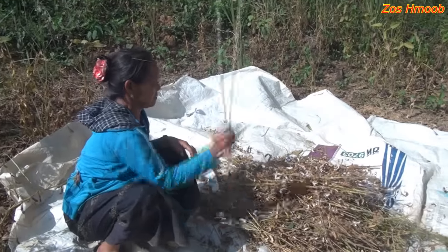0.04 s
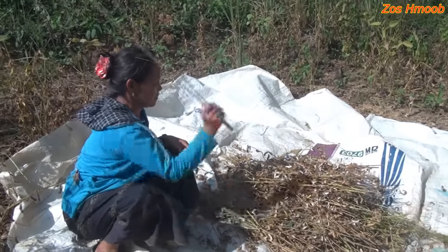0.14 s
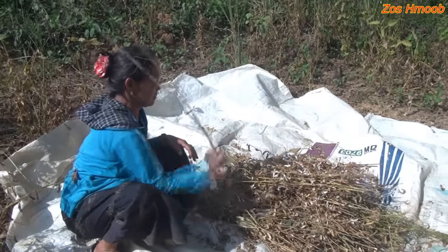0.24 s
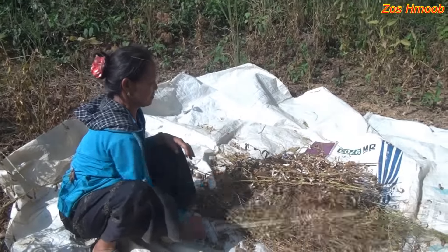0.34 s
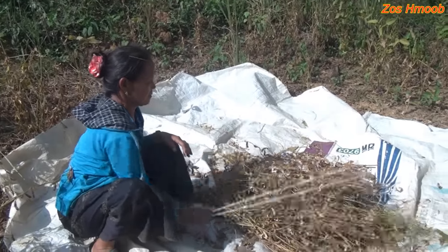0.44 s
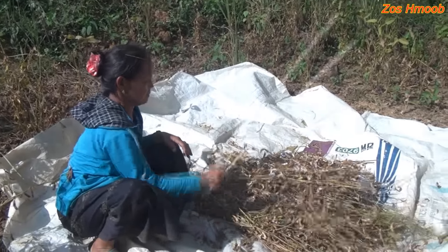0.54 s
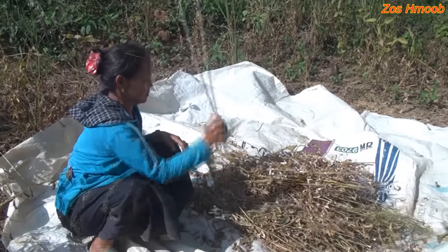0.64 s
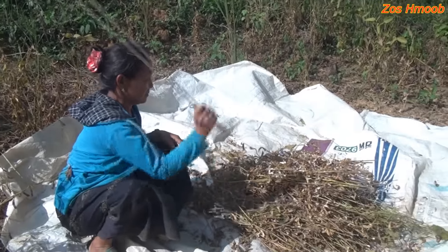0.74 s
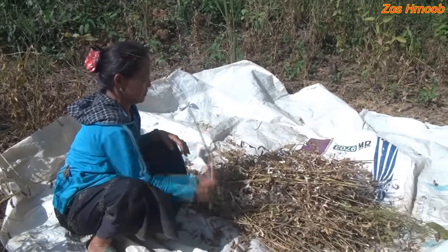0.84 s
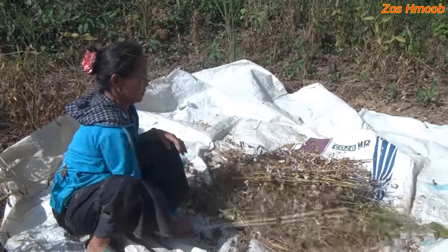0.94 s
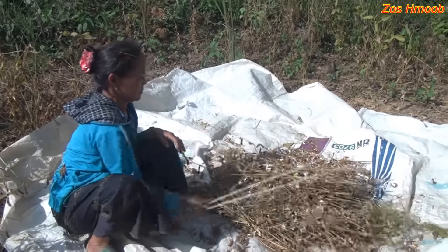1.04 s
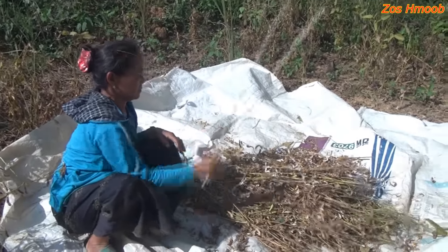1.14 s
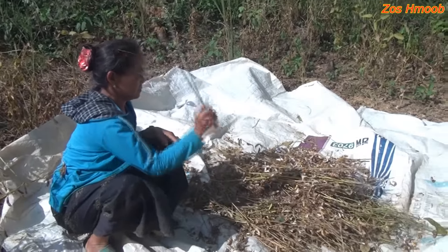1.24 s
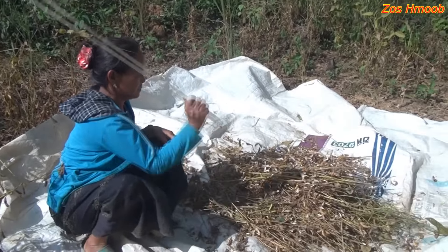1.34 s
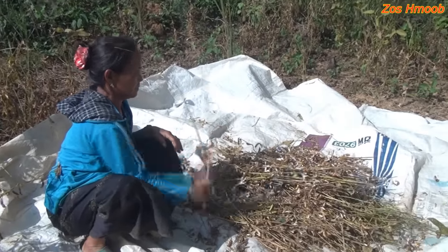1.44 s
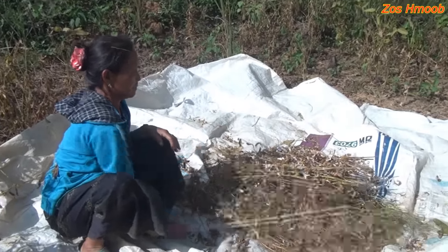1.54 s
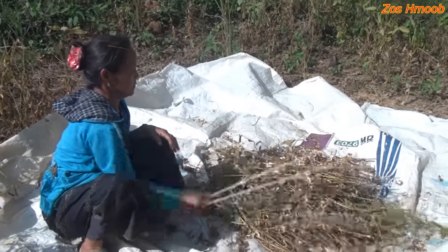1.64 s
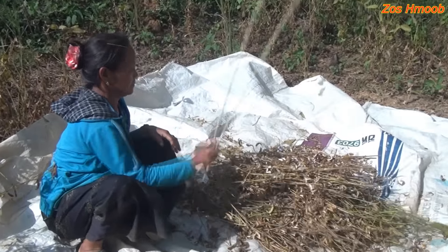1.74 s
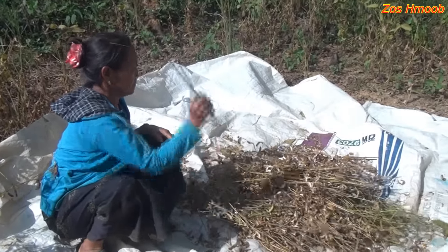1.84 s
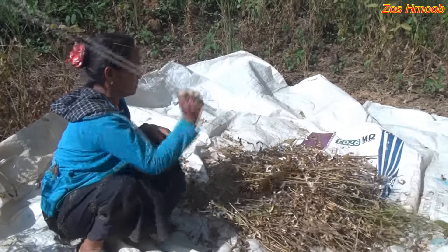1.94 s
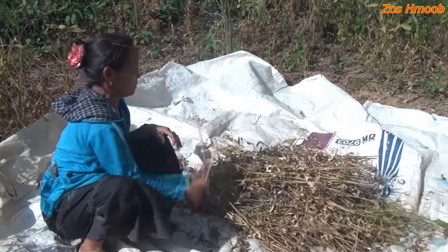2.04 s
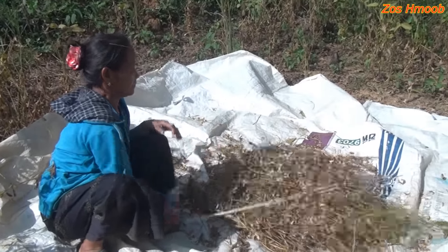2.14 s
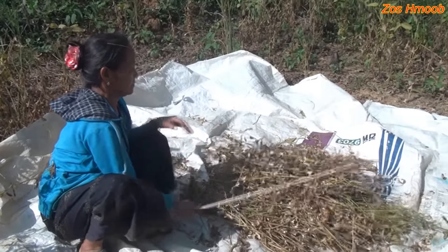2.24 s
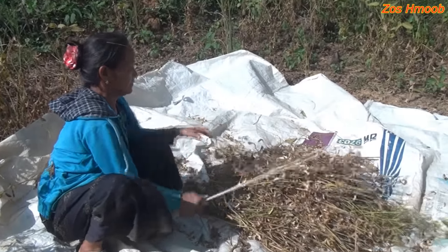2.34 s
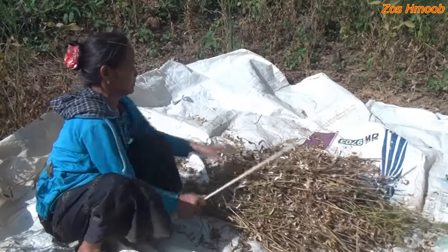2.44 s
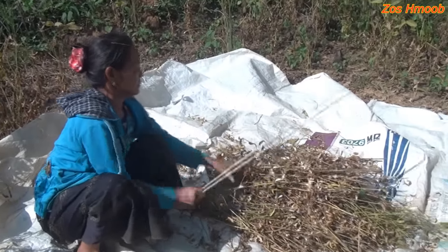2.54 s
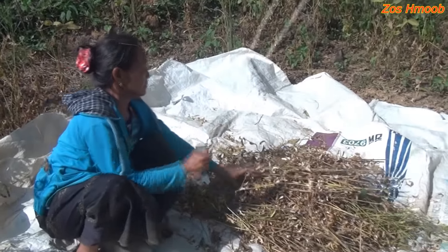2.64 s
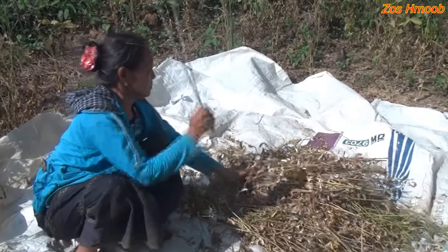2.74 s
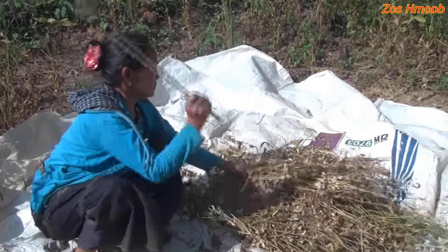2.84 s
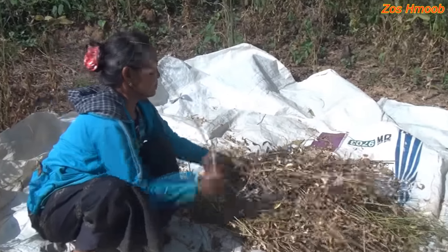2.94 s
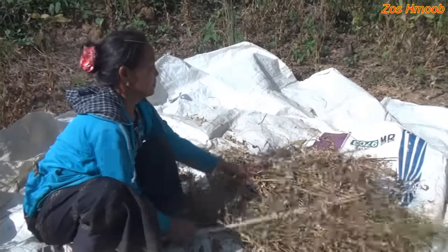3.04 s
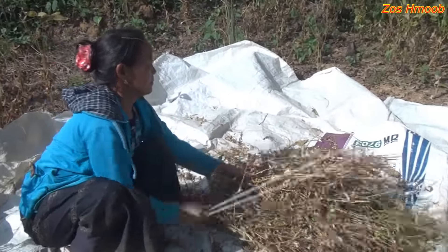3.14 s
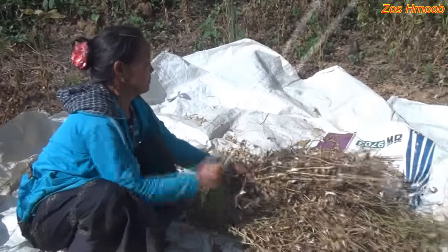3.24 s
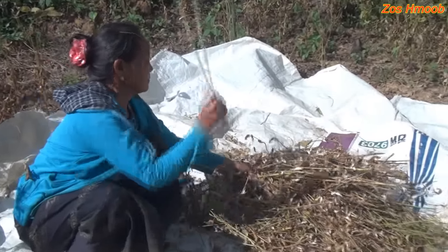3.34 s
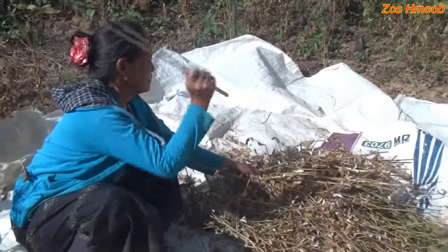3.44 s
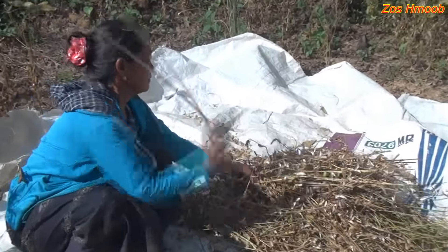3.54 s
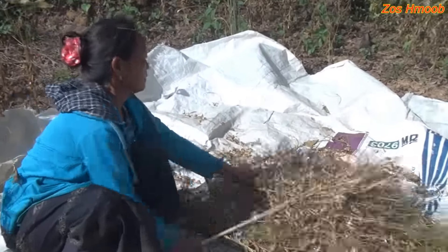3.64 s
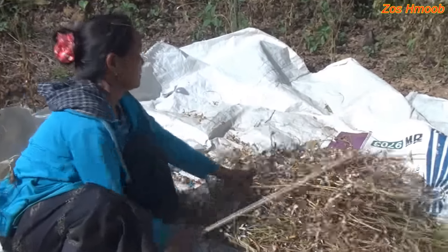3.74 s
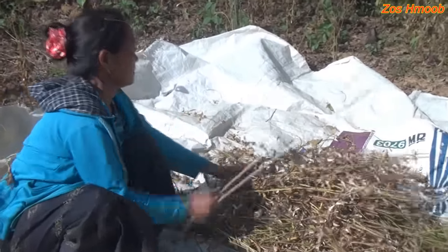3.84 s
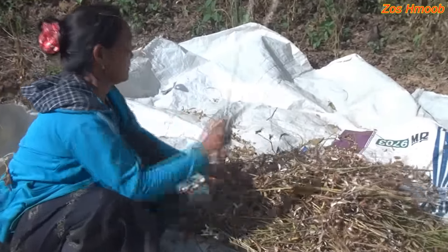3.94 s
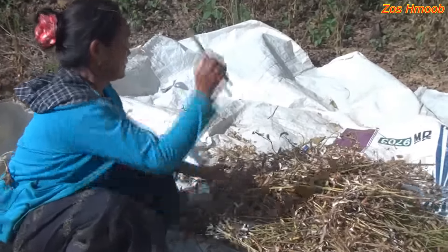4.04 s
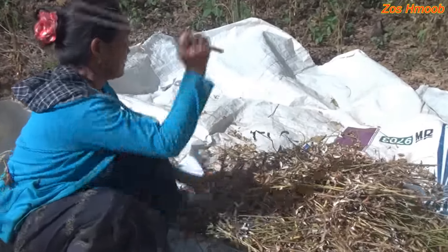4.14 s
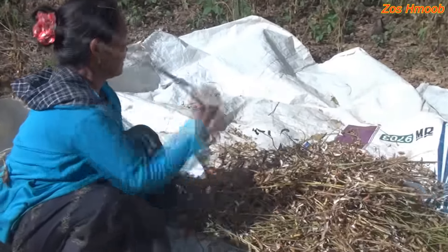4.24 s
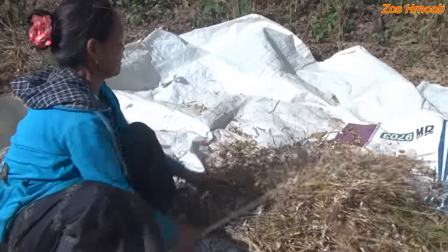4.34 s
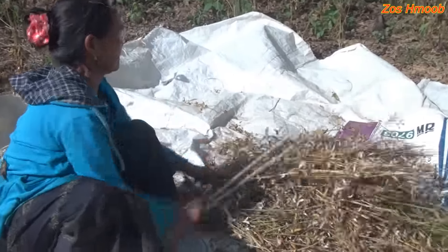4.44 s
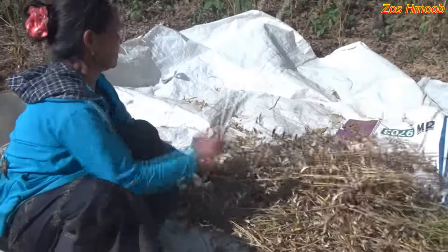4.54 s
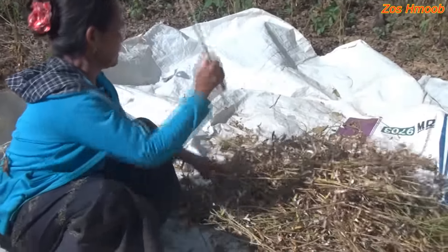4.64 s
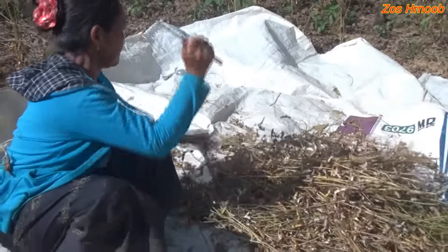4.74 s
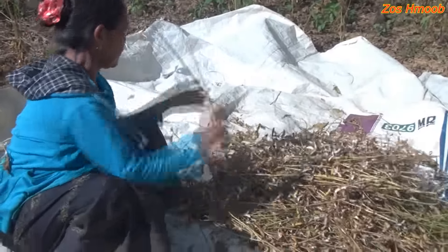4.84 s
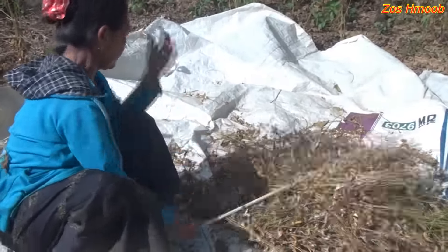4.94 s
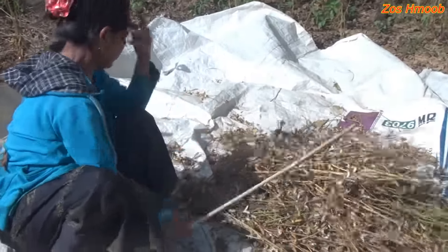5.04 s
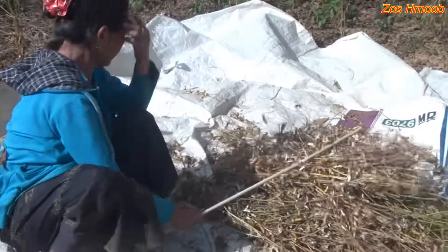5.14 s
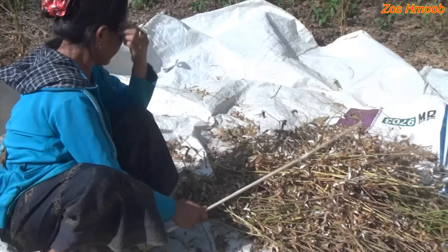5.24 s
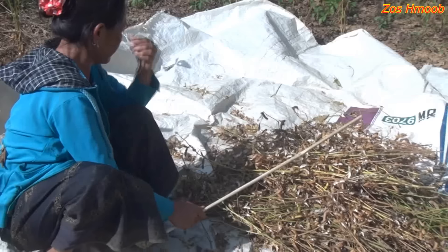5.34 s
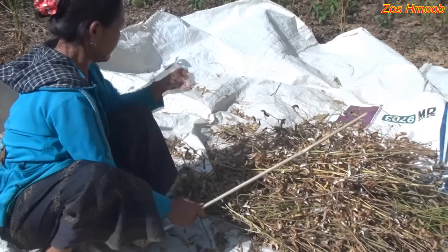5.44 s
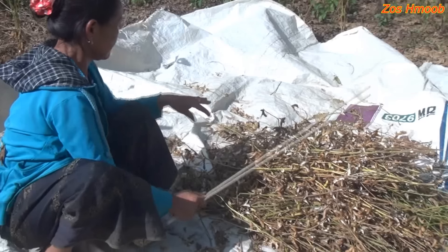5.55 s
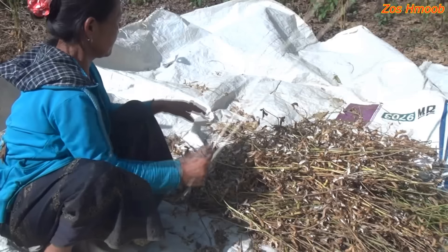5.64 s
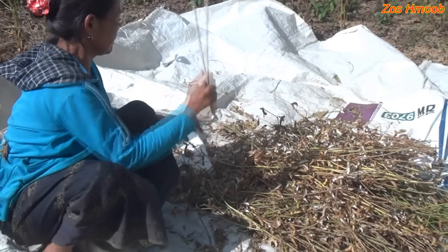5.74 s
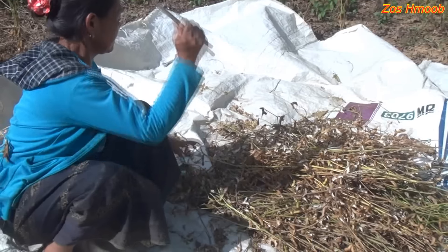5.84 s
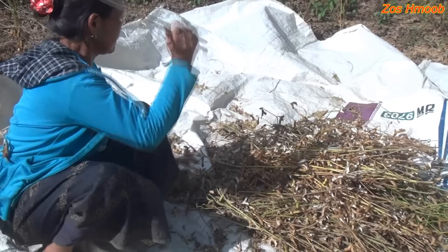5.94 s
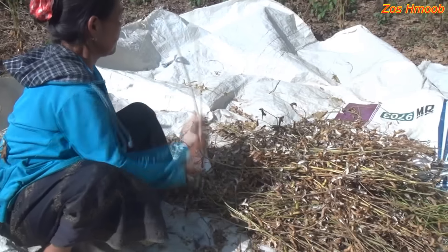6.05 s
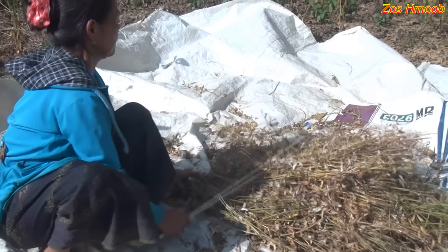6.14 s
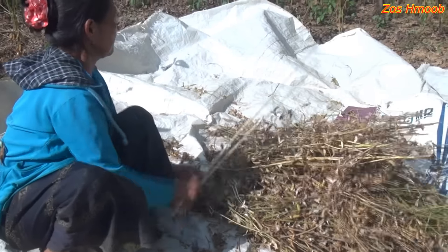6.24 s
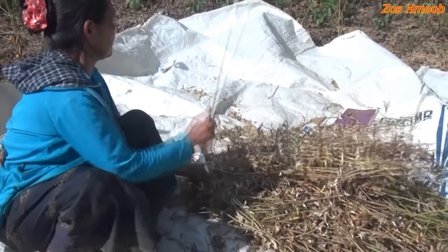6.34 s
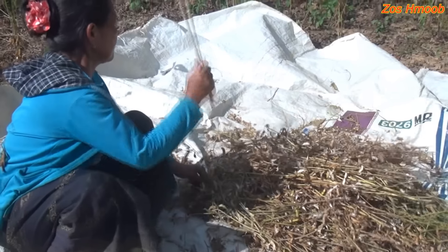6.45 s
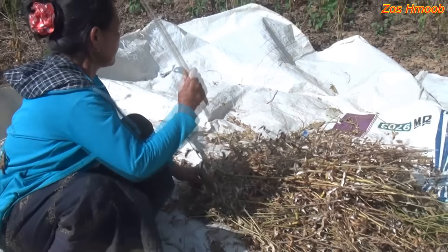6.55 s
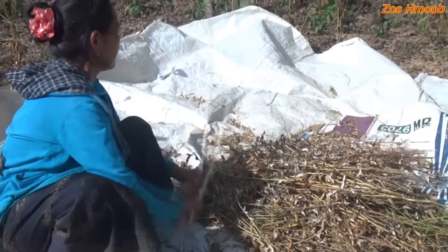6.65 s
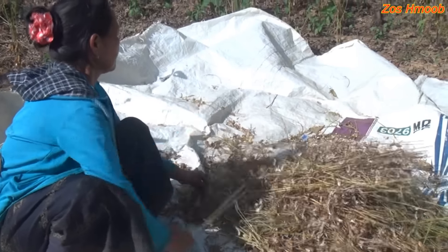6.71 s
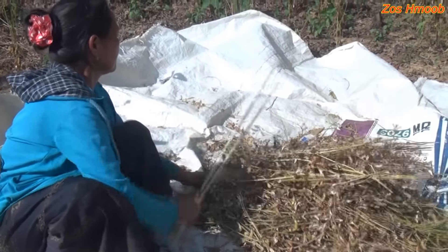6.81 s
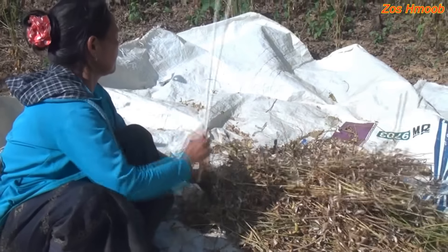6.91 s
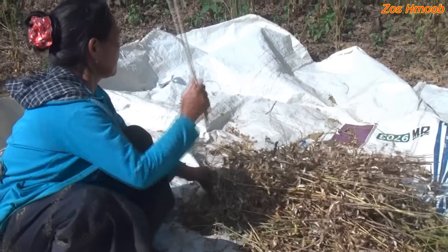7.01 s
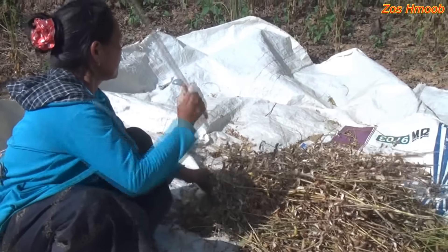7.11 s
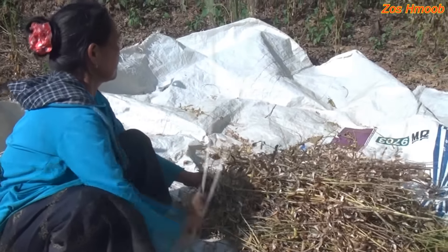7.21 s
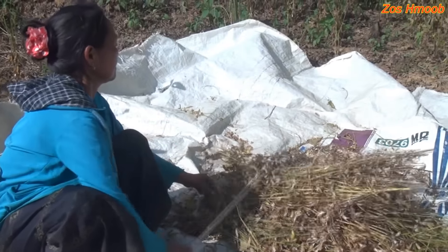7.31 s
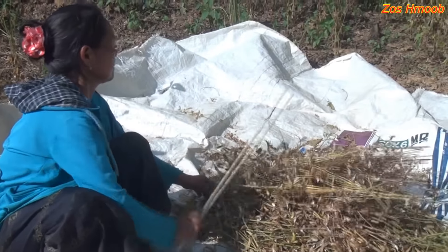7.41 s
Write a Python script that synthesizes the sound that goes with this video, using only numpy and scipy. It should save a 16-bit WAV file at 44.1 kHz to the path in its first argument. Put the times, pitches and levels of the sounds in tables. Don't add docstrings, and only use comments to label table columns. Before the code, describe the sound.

A thin stick swishes down and whips a heap of dry stalks on a plastic tarp, crackling sharply, with insects trilling faintly in a field.

```python
import sys
import numpy as np
from scipy import signal
from scipy.fft import rfft, irfft, next_fast_len
from scipy.io import wavfile
from scipy.ndimage import map_coordinates

SR = 44100
rng = np.random.default_rng(int(sys.argv[2]) if len(sys.argv) > 2 else 0)


def convert_level_to_amplitude(level_db):
    exponent = np.asarray(level_db, float) / 20
    return 10 ** exponent


def to_wav(sig):
    pcm = np.clip(np.atleast_2d(sig), -1, 1) * 32767
    pcm = np.round(pcm).astype(np.int16)
    wavfile.write(sys.argv[1], SR, pcm.T)


N = 329720
TOP_HZ = 15800


def unit(x):
    return x / np.sqrt(np.mean(x ** 2) + 1e-20)


def along(points, hz):
    point_hz, value = np.transpose(points)
    return np.interp(np.log(hz + 1), np.log(point_hz + 1), value)


def curves(rows):
    start_s, *columns = np.transpose(rows)
    return [np.interp(np.arange(N) / SR, start_s, c) for c in columns]


def wobble(rate_hz):
    knots = rng.standard_normal(int(N * rate_hz / SR) + 4)
    return map_coordinates(knots, [np.arange(N) * rate_hz / SR])


def filtered(x, response):
    m = next_fast_len(N + SR // 2)
    return irfft(rfft(x, m) * response(np.fft.rfftfreq(m, 1 / SR)), m)[..., :N]


def mode(f, hz, width_hz):
    return 1j * f * width_hz / (hz * hz - f * f + 1j * f * width_hz)


def placed(pair, balance, alike):
    def mid_side(hz):
        turn = np.arccos(np.clip(along(alike, hz), -1, 1)) / 2
        return np.array([np.cos(turn), np.sin(turn)])

    def share(hz):
        half = convert_level_to_amplitude(along(balance, hz) / 2)
        return np.array([half, 1 / half]) * 2 / (half + 1 / half)

    mid, side = filtered(pair, mid_side)
    return filtered(np.array([mid + side, mid - side]), share)


def crackle(spectrum, per_s, spread_db, bed, sharp, patchy_db):
    m = next_fast_len(N + 4096)
    f = np.fft.rfftfreq(m, 1 / SR)
    bands_hz = np.geomspace(400, 14500, 12)
    total, power = 0, 1e-9
    for hz in bands_hz:
        struck = rng.random(N) < per_s / SR / len(bands_hz)
        size = struck * convert_level_to_amplitude(spread_db * np.minimum(rng.exponential(1, N), 4))
        clicks = unit(size * rng.standard_normal((2, N))) + bed * rng.standard_normal((2, N))
        ring = mode(f, hz, hz / sharp) / np.sqrt(hz)
        total = total + rfft(clicks * convert_level_to_amplitude(patchy_db * wobble(30)), m) * ring
        power = power + np.abs(ring) ** 2
    even = np.sqrt(power)
    return unit(irfft(total / even * convert_level_to_amplitude(along(spectrum, f)), m)[:, :N])


# start_s, peak_db, rise_s, t60_s, crush_lag_s, crush_db (re peak)
BLOW_EVENTS = [(0.4867, -4.5, 0.0034, 0.18, 0.023, -20), (1.064, -4, 0.0046, 0.18, 0.021, -17.5),
               (1.6628, -2.5, 0.0055, 0.14, 0.0173, -17.5), (2.2447, -5, 0.0014, 0.18, 0.017, -19),
               (3.1617, -3, 0.0018, 0.18, 0.019, -22), (3.7753, -4.5, 0.0031, 0.17, 0.015, -18.5),
               (4.4892, -8, 0.0038, 0.21, 0.018, -15), (5.0811, -4, 0.0015, 0.17, 0.0178, -18.5),
               (6.2637, -2.5, 0.0047, 0.13, 0.019, -19.5), (6.8364, -3, 0.0017, 0.14, 0.016, -15.5),
               (7.4025, -3, 0.0023, 0.15, 0.017, -19)]
# start_s, peak_db
STEM_CRACKS = [(0.484, -8), (0.4896, -5), (0.4947, -13.5), (1.0657, -14), (1.0696, -2), (1.0708, -6.5),
               (1.6651, -8.5), (1.6715, -12.5), (1.6805, -11), (2.2494, 1), (2.2563, -13.5), (2.2627, -16),
               (3.1618, -2.5), (3.1655, -5.5), (3.1733, -13), (3.776, -2), (3.7788, -8.5), (3.7913, -24),
               (4.492, -2.5), (4.4944, -6.5), (4.5038, -7.5), (5.0837, -1), (5.0872, -4), (5.0915, -16),
               (6.265, 1.5), (6.2682, -4), (6.2738, -28), (6.8374, 4.5), (6.8433, -9), (6.8579, -4.5),
               (7.4043, -6), (7.4083, 1), (7.4182, -14.5)]
# freq_hz, level_db (per Hz)
STEM_SPECTRUM = [(880, -43.5), (1500, -18.5), (2860, -7), (3690, -1.5), (6000, -1.5), (6560, -2.5),
                 (8160, 1.5), (12200, -1), (15200, -6), (16000, -50.5)]
# freq_hz, level_db (per Hz)
CRUSH_SPECTRUM = [(120, -31), (200, -8), (1590, 1), (1770, -1.5), (1970, 6.5), (2350, -2), (2580, 1),
                  (5000, -9), (6500, -25.5), (11000, -120)]
# freq_hz, width_hz, level_db
GROUND_MODES = [(81, 46, 3), (154, 28, 7), (262, 48, 6)]


def blows():
    t = np.arange(N) / SR
    snap, crush, push = np.zeros(N), np.zeros(N), np.zeros(N)
    for start_s, peak_db, rise_s, t60_s, lag_s, crush_db in BLOW_EVENTS:
        u = t - start_s + 0.0025
        bite_db = -12 * np.exp(-np.clip(u, 0, None) / 0.0018)
        slope_db = np.where(u < 0, 30 * u / rise_s, -60 * u / t60_s)
        snap += convert_level_to_amplitude(peak_db - 10 + bite_db + slope_db)
        v = np.clip(u, 0, None) / lag_s
        crush += convert_level_to_amplitude(peak_db + crush_db - 5.5) * v ** 1.28 * np.exp(1.714 * (1 - v))
        push[round((start_s + .6 * lag_s) * SR)] = convert_level_to_amplitude(peak_db + crush_db + 19)
    for start_s, peak_db in STEM_CRACKS:
        snap += convert_level_to_amplitude(peak_db - 14 - 60 * np.abs(t - start_s) / np.where(t < start_s, .002, .012))

    def ground_response(f):
        return sum((-1) ** k * convert_level_to_amplitude(level_db) * mode(f, hz, width_hz)
                   for k, (hz, width_hz, level_db) in enumerate(GROUND_MODES))

    bunches = convert_level_to_amplitude(1.3 * wobble(220))
    stems = snap * bunches * crackle(STEM_SPECTRUM, 12000, spread_db=2.5, bed=.6, sharp=2, patchy_db=1.2)
    crushed = crackle(CRUSH_SPECTRUM, 7000, spread_db=2.5, bed=.6, sharp=2.5, patchy_db=1.5)
    crushed = crush * convert_level_to_amplitude(1.5 * wobble(120)) * crushed
    return stems + crushed + filtered(push, ground_response) * [[1], [0]]


# start_s, end_s, first_hz, last_hz, first_db, last_db
SWISHES = [(.41, .5, 210, 262, -44, -42.5), (0.982, 1.088, 200, 238.3, -52, -47),
           (1.576, 1.679, 190, 271, -48.5, -41.5), (2.171, 2.251, 230, 262, -50, -38),
           (3.084, 3.186, 200, 260.3, -57.5, -42), (3.704, 3.785, 200, 258, -46, -43.5),
           (4.413, 4.505, 230, 257.6, -57, -38), (5.006, 5.097, 180, 221, -51, -42.5),
           (6.181, 6.285, 140, 218, -63, -47.5), (6.756, 6.846, 120, 223, -68, -49),
           (7.334, 7.419, 180, 225, -60, -38)]


def swish():
    t = np.arange(N) / SR
    pitch_hz, level, late = np.full(N, 200.), np.zeros(N), np.zeros(N)
    for start_s, end_s, first_hz, last_hz, first_db, last_db in SWISHES:
        gate = np.clip((t - start_s) / 0.024, 0, 1) * np.clip((end_s + 0.026 - t) / 0.044, 0, 1)
        on = gate > 0
        level += gate * convert_level_to_amplitude(np.interp(t, [start_s, end_s], [first_db, last_db]))
        knots_s = [start_s, .6 * start_s + .4 * end_s, end_s]
        pitch_hz[on] = np.interp(t, knots_s, [.82 * first_hz, last_hz, .95 * last_hz])[on]
        late[on] = np.interp(t, [start_s, end_s], [.15, 1])[on]
    phase = 2 * np.pi * np.cumsum(pitch_hz) / SR

    def band(ratio, width_hz):
        return wobble(width_hz) * np.sin(ratio * phase) + wobble(width_hz) * np.cos(ratio * phase)

    air = .5 * np.sin(phase + 1.3 * wobble(35)) + .55 * band(1.05, 90)
    air += late * (.33 * band(.6, 70) + .15 * band(1.5, 160))
    return level * air * [[1], [0]]


# start_s, husks_db, stalks_db
RUSTLE_GAPS = [
    [(0.0, -46.5, -44), (0.052, -56, -51.5), (0.108, -58, -51.5), (0.256, -65, -69), (0.366, -77, -66),
     (0.43, -67, -76), (0.475, -69, -59)],
    [(0.54, -43, -39), (0.614, -55, -49.5), (0.754, -57, -54), (0.81, -70, -67), (0.986, -75, -67),
     (1.022, -65, -69), (1.05, -84, -55)],
    [(1.12, -43, -39.5), (1.216, -56.5, -51.5), (1.294, -54.5, -56.5), (1.53, -79, -70), (1.538, -57, -56),
     (1.558, -79, -74), (1.65, -61, -58)],
    [(1.72, -39.5, -37), (1.806, -57.5, -51.5), (1.906, -55, -50.5), (1.932, -64, -59), (2.148, -69, -61),
     (2.184, -70, -66), (2.235, -71, -56)],
    [(2.3, -41.5, -37.5), (2.32, -48, -43.5), (2.398, -56, -53.5), (2.518, -54, -57), (2.666, -85, -69),
     (2.686, -58.5, -69), (2.75, -68, -73)],
    [(2.79, -53, -55), (2.872, -45.5, -49), (2.894, -37, -47), (2.934, -43, -48.5), (2.962, -42.5, -53.5),
     (3.15, -51, -49)],
    [(3.22, -56, -35), (3.252, -42, -44.5), (3.438, -61, -56.5), (3.448, -56, -56), (3.506, -65, -62),
     (3.63, -63.5, -55), (3.76, -54, -50)],
    [(3.83, -41, -33.5), (3.888, -47.5, -47.5), (4.044, -60.5, -57), (4.196, -58.5, -58),
     (4.228, -64.5, -69), (4.406, -54.5, -49), (4.418, -60, -61), (4.475, -63, -53)],
    [(4.54, -40, -40.5), (4.638, -56.5, -52), (4.756, -53.5, -55), (4.874, -69.5, -71), (4.892, -65.5, -63),
     (4.992, -80, -69), (5.07, -84, -63)],
    [(5.14, -37.5, -42.5), (5.182, -48.5, -46.5), (5.218, -54, -53.5), (5.316, -55.5, -57),
     (5.436, -73.5, -68), (5.452, -72.5, -61), (5.462, -72, -82), (5.755, -85, -82.5)],
    [(5.79, -84.5, -66), (5.96, -85, -81), (5.97, -68, -45), (5.986, -79, -83), (6.116, -66, -55),
     (6.146, -77, -71), (6.25, -67, -59)],
    [(6.32, -39, -41.5), (6.396, -54.5, -51), (6.6, -52.5, -58.5), (6.68, -72, -73), (6.692, -63, -67),
     (6.792, -66, -65), (6.82, -66, -55)],
    [(6.89, -39, -39), (6.952, -52, -48), (7.114, -54.5, -53), (7.258, -61, -62), (7.268, -69, -68),
     (7.348, -71, -60), (7.39, -85, -62)],
    [(7.45, -41, -40), (7.476, -47, -43)],
]
# freq_hz, level_db (per Hz)
HUSK_SPECTRUM = [(1760, -26.5), (3000, -5.5), (4170, -2), (6670, -4.5), (8110, 1), (10400, 1), (13200, -3),
                 (16000, -12.5)]
# freq_hz, level_db (per Hz)
STALK_SPECTRUM = [(180, -40), (300, -8), (515, -10), (557, -8.5), (755, -5.5), (1260, -5.5), (4190, -4.5),
                  (7000, -8), (9100, -29), (15400, -120)]


def rustle():
    rows = list(RUSTLE_GAPS[0])
    for gap in RUSTLE_GAPS[1:]:
        rows.append((rows[-1][0] + .012, *rows[-1][1:]))
        rows += list(gap)
    husk_db, stalk_db = curves(rows)
    lumps_db = 1.1 * wobble(45)
    husks = crackle(HUSK_SPECTRUM, 7000, spread_db=1.5, bed=1.0, sharp=4, patchy_db=1.0)
    husks = husks * convert_level_to_amplitude(husk_db + 3.0 + lumps_db)
    stalks = crackle(STALK_SPECTRUM, 3500, spread_db=2.7, bed=.75, sharp=4, patchy_db=2)
    stalks = stalks * convert_level_to_amplitude(stalk_db + lumps_db + 1.1 * wobble(25))
    return filtered(husks + stalks, lambda hz: hz < TOP_HZ)


# start_s, peak_db, pitch_hz, left_right_db, ring_cycles,
# splinter_db
LONE_SNAPS = [(0.7597, -36, 4670, -12, 2, -11), (0.8452, -38, 7100, -9, 2, -3),
              (0.9282, -43, 1930, -13, 1.5, 1.5), (1.3022, -38.5, 3130, -12, 1.3, 5),
              (2.142, -40.5, 758, -13.5, 1.7, 6.5), (2.546, -30, 8300, -8, 3.1, -13),
              (2.6853, -43.5, 7150, -3, 2, -10), (2.7661, -35, 10000, -8.5, 2, -6),
              (2.999, -22.5, 8340, -7.5, 2.7, -5.5), (3.0034, -28, 7600, -6.5, 2.2, -8),
              (3.0124, -23.5, 8016, -4, 2.8, -6), (3.0586, -22, 9190, -7, 1.8, -4),
              (3.3552, -31.5, 11400, -5, 2, -3), (3.7342, -38, 1030, -3.5, 1.33, 3),
              (3.908, -22.5, 10160, -4, 1.5, -14), (4.0637, -43, 5110, -9, 2, -11),
              (4.0928, -35, 3040, -6.5, 2, -10), (4.1373, -34, 8000, -0.5, 2.7, -12),
              (4.178, -48.5, 1590, -5, 2, -6), (4.1984, -37, 7253, -5.5, 1.8, -1),
              (4.3694, -35.5, 2040, -5, 2.4, -8), (4.394, -29.5, 2210, -5.0, 1.6, -6),
              (4.582, -17.5, 8540, -9, 2, -13), (5.3263, -35, 8200, -7.5, 2.3, -5),
              (5.4494, -49, 7200, -1.5, 2, -6), (5.9708, -36.5, 1920, -5, 1.7, -13),
              (6.0287, -38.5, 7140, -4.5, 1.9, -8), (7.213, -29, 9890, -2.5, 5.5, -8),
              (7.3387, -35, 1366, -9, 1.3, 0),
              (2.0762, -31, 1500, -8, 1.5, -6), (2.9855, -22, 7700, -7, 2.5, -10),
              (5.7686, -25, 12400, -8.5, 3, -14), (3.832, -18, 1900, -6, 2, -6),
              (3.858, -22, 1800, -6, 2, -6), (6.111, -43, 1300, -4, 2, -6), (3.088, -38, 1100, -6, 2, -8),
              (1.5374, -41, 6000, -2, 2, -6), (6.849, -13, 1050, -8, 3, -8), (7.418, -18, 900, -8, 2.5, -8)]
# start_s, peak_db, pitch_hz, left_right_db, ring_cycles, splinter_db
POD_TICKS = [(1.8942, -36.5, 4080, -12, 7.7, -18), (1.9004, -40, 4240, -8, 7, -18),
             (1.9395, -44, 4310, -8, 7, -18), (1.9619, -45, 4390, -9, 7, -18),
             (2.0254, -38.5, 4340, -8, 8, -18), (2.0453, -46, 4260, -6.5, 7, -18),
             (2.0652, -44, 4480, -8, 7, -15), (2.38, -31, 4400, -9, 6.1, -14),
             (2.6045, -47, 4500, -1.5, 7, -18), (3.451, -26, 4616, -9.0, 7.8, -10),
             (3.4558, -28, 4330, -8.0, 4.7, -12), (3.4644, -37, 4410, -4, 7, -15),
             (3.4794, -41, 4600, -6, 7.6, -17), (4.0941, -40.5, 4020, -4, 7.3, -12),
             (4.275, -36.5, 4340, -9, 7, -15), (4.2824, -39.5, 4270, -8, 7, -17),
             (4.2994, -44.5, 4640, -10, 7, -18), (5.7653, -52.5, 4240, 0.5, 7, -15.5)]
# start_s, peak_db, pitch_hz, left_right_db, ring_cycles, splinter_db
TARP_KNOCKS = [
    (0.143, -42, 656, -8, 1.5, -20),
    (2.084, -54, 816, -12, 1.5, -20),
    (2.634, -45, 630, -9.5, 1.5, -20),
    (5.766, -52.5, 332, -14, 2.8, -20),
]


def snaps():
    out, t = np.zeros((2, N + SR)), np.arange(SR // 20) / SR
    for start_s, peak_db, pitch_hz, pan_db, cycles, splinter_db in LONE_SNAPS + POD_TICKS + TARP_KNOCKS:
        ring = np.sin(2 * np.pi * pitch_hz * t) * np.exp(-t * pitch_hz / cycles)
        edges_hz = [pitch_hz / 1.6, min(2.5 * pitch_hz, TOP_HZ)]
        b, a = signal.butter(2, edges_hz, "band", fs=SR)
        splinters = unit(signal.lfilter(b, a, rng.standard_normal(len(t))))
        decay = convert_level_to_amplitude(-60 * t / 0.0039) + 0.07 * convert_level_to_amplitude(-60 * t / 0.04)
        puff = convert_level_to_amplitude(splinter_db) * splinters * decay
        side = convert_level_to_amplitude(np.array([[.5], [-.5]]) * pan_db)
        contact = convert_level_to_amplitude(peak_db - 2) * (ring / ring.max() + puff)
        out[:, round(start_s * SR):][:, :len(t)] += contact * side * 2 / side.sum()
    return filtered(out[:, :N], lambda f: (f > 150) * (f < TOP_HZ))


# start_s, end_s, level_db
TRILL_PHRASES = [(-.4, 0.306, -63.5), (0.502, 1.2, -65), (1.366, 2.09, -64), (2.301, 2.98, -64.5),
                 (3.159, 3.852, -62.5), (4.02, 4.757, -63.5), (4.925, 5.652, -65.5), (5.804, 6.55, -65),
                 (6.95, 7.602, -65)]


def cricket():
    t, out = np.arange(N) / SR, np.zeros(N)
    scatter = .04 * wobble(16)
    grit_db = 1.1 * wobble(23) + 3.7 * wobble(300)
    for start_s, end_s, level_db in TRILL_PHRASES:
        stroke = ((t - start_s) * 28.8 + scatter) % 1
        swell = np.exp(-((stroke - .45) / .27) ** 2) + .3 * np.exp(-((stroke - .85) / .07) ** 2) + .3
        pitch_hz = 7170 - 240 * (stroke > .78) * (stroke < .93) - 220 * (t - start_s < .03)
        gate = np.clip((t - start_s) / .03, 0, 1) * np.clip((end_s - t) / 0.055, 0, 1)
        tone = np.sin(2 * np.pi * np.cumsum(pitch_hz) / SR + .7 * grit_db / 3)
        out += convert_level_to_amplitude(level_db + 4 + grit_db) * gate * swell * tone
    return out * convert_level_to_amplitude([[-1.5], [1.5]])


def insect(level_db, hz, width_hz, syllables_hz, clicks_hz, depth_db):
    t = np.arange(N) / SR
    beat = np.sin(2 * np.pi * np.cumsum(syllables_hz * (1 + 0.024 * wobble(2.9))) / SR)
    stroke = np.cos(2 * np.pi * clicks_hz * t + 1.78 * wobble(8))
    drive = convert_level_to_amplitude(depth_db * beat + .5 * depth_db * stroke) * rng.standard_normal((2, N))
    return convert_level_to_amplitude(level_db) * unit(filtered(drive, lambda f: mode(f, hz, width_hz) ** 2))


# start_s, end_s, first_hz, last_hz, level_db
BIRD_SLIDES = [
    (2.565, 2.66, 6450, 4700, -70),
    (2.69, 2.79, 5000, 6000, -70),
]


def bird():
    t, out = np.arange(N) / SR, np.zeros(N)
    for start_s, end_s, first_hz, last_hz, level_db in BIRD_SLIDES:
        u = np.clip((t - start_s) / (end_s - start_s), 0, 1)
        phase = 2 * np.pi * np.cumsum(first_hz + (last_hz - first_hz) * u) / SR
        out += convert_level_to_amplitude(level_db) * np.sin(np.pi * u) ** .5 * np.sin(phase)
    return out * convert_level_to_amplitude(4 * wobble(90))


def hum():
    drone = unit(filtered(rng.standard_normal((2, N)), lambda f: mode(f, 334, 70) ** 2))
    swell_db = np.interp(np.arange(N) / SR, [0, .2, .4, .6, 7.5], [-4, -5, -0.5, -14, -12])
    return convert_level_to_amplitude(swell_db + 3.2 * wobble(3) - 62.5) * drone


# freq_hz, level_db (per Hz)
AIR_SPECTRUM = [(16, -36), (27, -11.5), (114, -6), (351, -1.5), (412, -2.5), (703, -1.5), (943, -3),
                (1170, -2.5), (2280, -5), (3310, -6.5), (5950, -15.5), (8430, -10.5), (9380, -20),
                (14400, -18), (16000, -16)]
# freq_hz, left_right_db
FIELD_BALANCE = [(60, -9.5), (110, -12.5), (200, -9), (380, -12), (700, -5.5), (1290, 1), (2380, 1.0),
                 (4400, 0.5), (8120, -0.5), (15000, -18)]
# freq_hz, likeness (-1 to 1)
FIELD_LIKENESS = [(60, 0.8), (130, 0.89), (290, 0.15), (640, -0.067), (1410, -0.078), (3100, 0.0069),
                  (6820, 0.19), (15000, 0.49)]


def field():
    noise = rng.standard_normal((2, N))
    air = unit(filtered(noise, lambda hz: convert_level_to_amplitude(along(AIR_SPECTRUM, hz)) * (hz < TOP_HZ)))
    air *= convert_level_to_amplitude(-59 + 1.15 * wobble(2.12) + 1.7 * wobble(7))
    far = insect(-72 + 1.3 * wobble(3), hz=8550, width_hz=210, syllables_hz=42.4, clicks_hz=170, depth_db=2.8)
    return placed(air + hum() + far, FIELD_BALANCE, FIELD_LIKENESS) + cricket() + bird()


# freq_hz, left_right_db
HEAP_BALANCE = [(60, -5.5), (110, -20.5), (200, -12.5), (380, -10.5), (700, -11), (1290, -7), (2380, -5.5),
                (4400, -2.5), (8120, -6.5), (15000, -12)]
# freq_hz, likeness (-1 to 1)
HEAP_LIKENESS = [(60, 0.36), (130, 1), (290, 0.91), (640, 0.73), (1410, 0.76), (3100, 0.73), (6820, 0.68),
                 (15000, 0.72)]


def scene():
    heap = blows() + swish() + rustle()
    return placed(heap, HEAP_BALANCE, HEAP_LIKENESS) + snaps() + field()


def band_limit(x):
    return signal.sosfilt(signal.butter(12, 16950, fs=SR, output="sos"), x)


def record(dry):
    ceiling = .93
    mix = dry / (1 + np.abs(dry / ceiling) ** 8) ** (1 / 8)
    return band_limit(mix)


dry = scene()
out = record(dry)
to_wav(out)
```